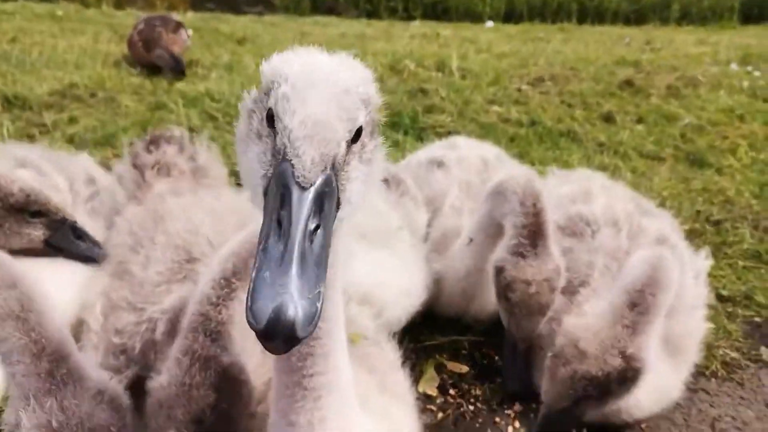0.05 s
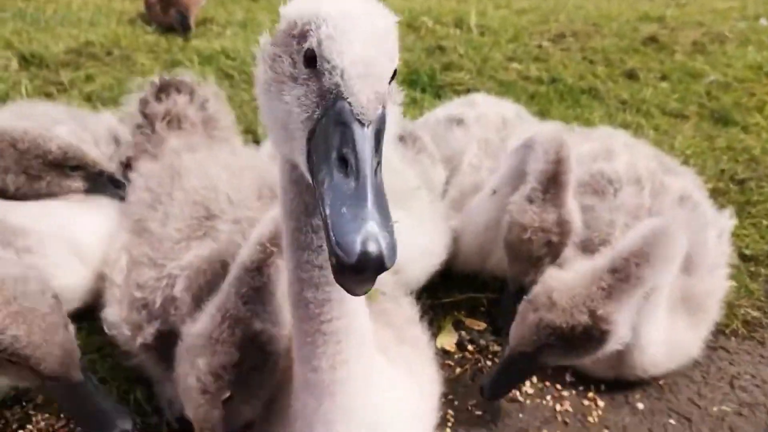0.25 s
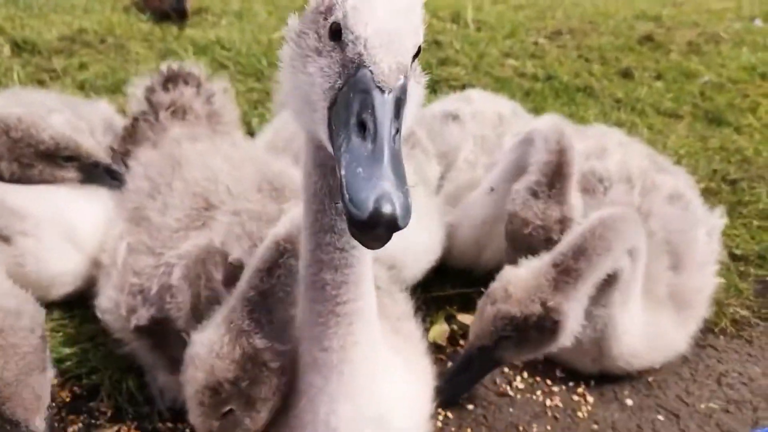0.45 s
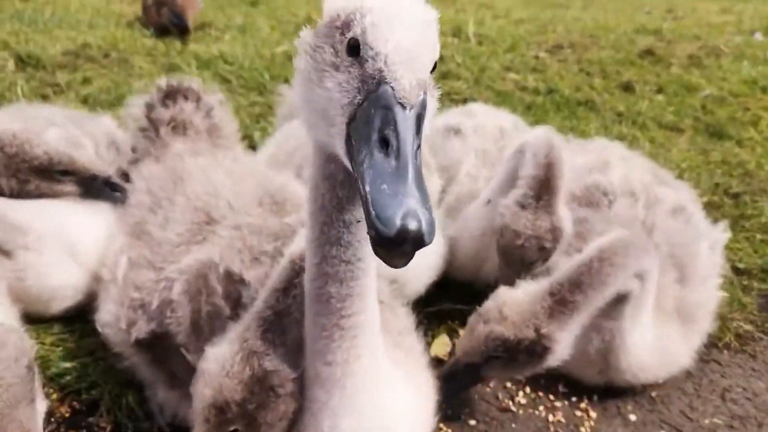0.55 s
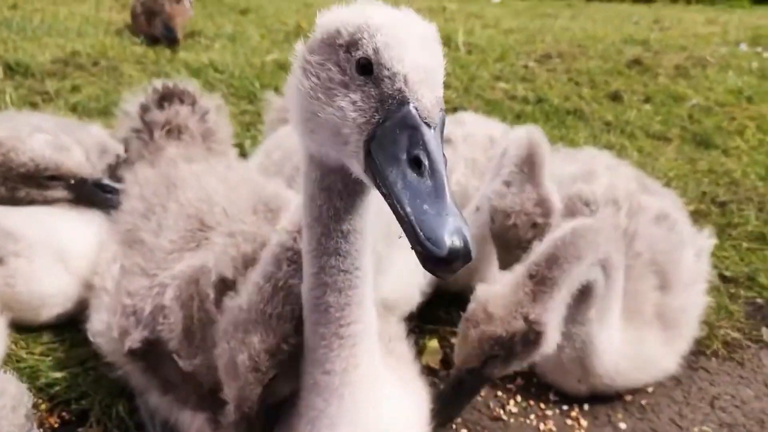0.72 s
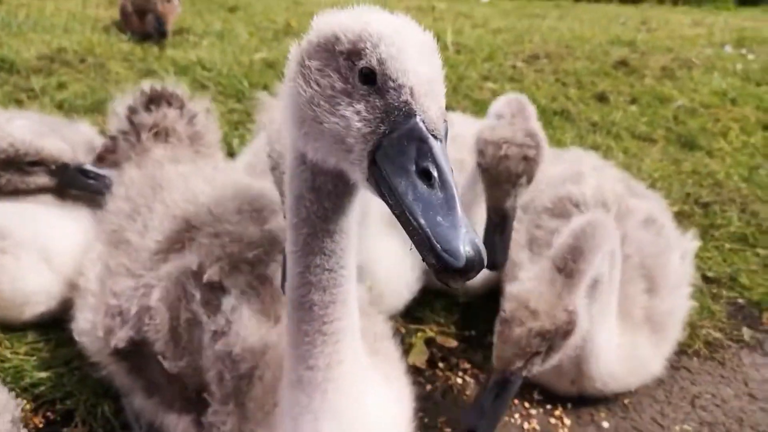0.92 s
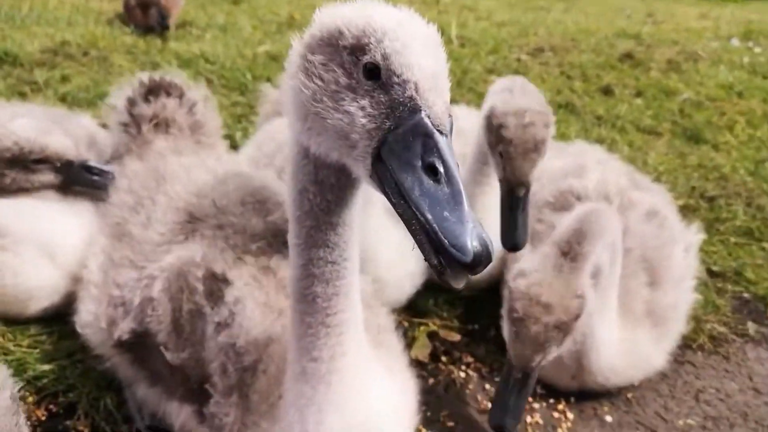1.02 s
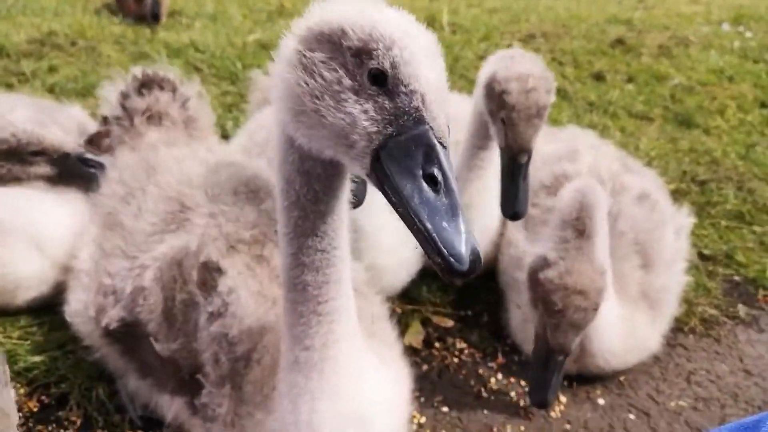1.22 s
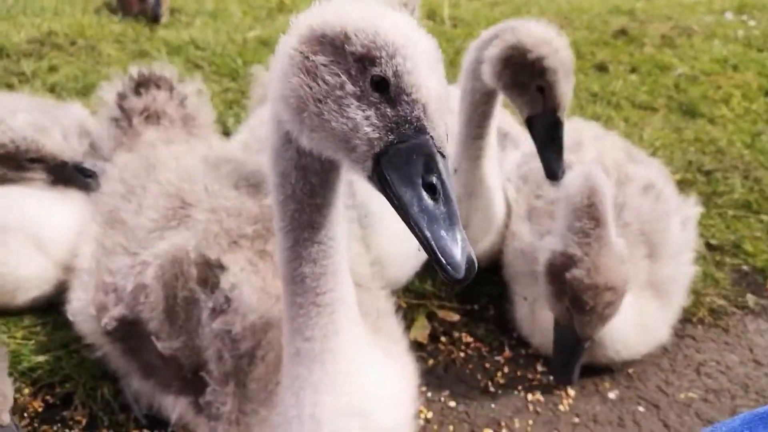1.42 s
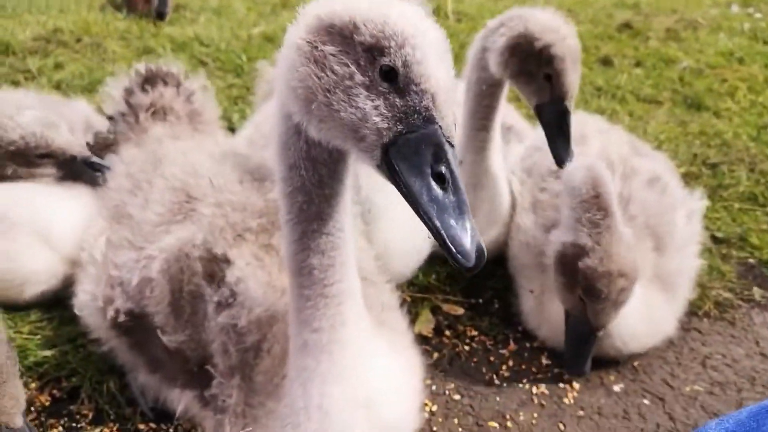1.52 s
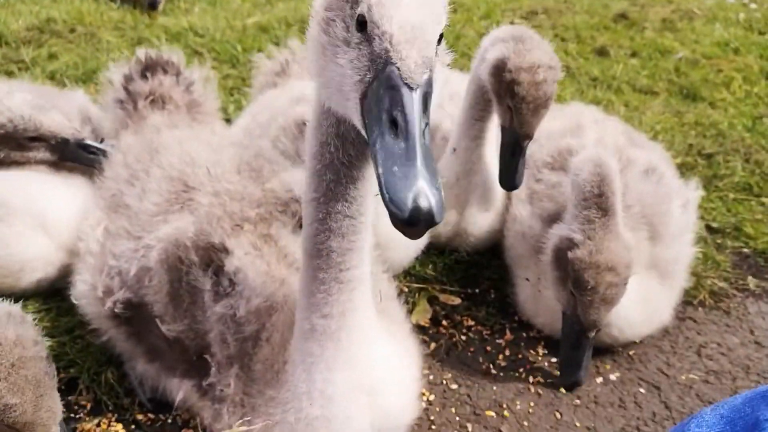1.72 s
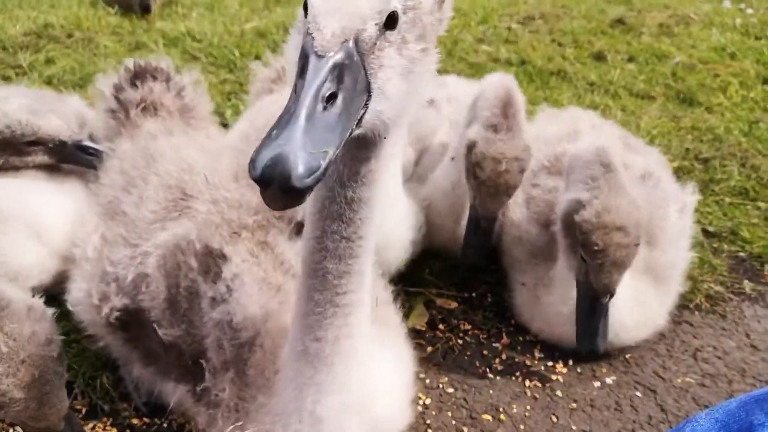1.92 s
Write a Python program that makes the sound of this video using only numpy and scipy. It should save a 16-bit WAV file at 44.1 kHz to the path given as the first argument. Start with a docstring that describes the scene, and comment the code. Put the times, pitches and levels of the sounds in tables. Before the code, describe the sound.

Young swans peep outdoors: the nearest gives three high, arched whistles, the second quavering, while others answer with soft chirps and trills. Bills tick on the ground and grass rustles faintly as wind rumbles on the microphone.

```python
"""Cygnets feeding on scattered grain at the edge of a lawn, on a stereo microphone pair.
The nearest bird gives three arched, whistling peeps, the second with a fast quaver; the others
answer with soft chirps and trills. Bills tick on the ground and feet shuffle in the grass.
Wind rumbles on the microphone over the faint hush of the distant surroundings."""
import sys
import numpy as np
from scipy import signal
from scipy.io import wavfile
from scipy.ndimage import uniform_filter1d

SR = 44100
rng = np.random.default_rng(int(sys.argv[2]) if len(sys.argv) > 2 else 0)


def master_out(mix):
    """Clip the mix to full scale and print it as 16-bit PCM to the path in sys.argv[1]."""
    frames = np.transpose(np.atleast_2d(mix))
    ceiling = np.clip(frames, -1, 1)
    pcm = np.round(ceiling * 32767).astype(np.int16)
    wavfile.write(sys.argv[1], SR, pcm)


N = 85995
TIME = np.arange(N) / SR

# how alike outdoor noise is at the two microphones: f/Hz, left-right correlation
OUTDOOR_LIKENESS = [(60, 1), (250, 0.77), (600, 0.22), (1200, 0.34), (2500, 0.2), (5000, 0.081),
                    (12000, 0.088)]


def from_db(db):
    """Decibels to gain."""
    return 10 ** (np.asarray(db) / 20)


def unit_rms(x):
    """Scale to rms 1."""
    return x / np.sqrt(np.mean(x ** 2) + 1e-20)


def in_time(rows):
    """Each column of a timed curve, at every sample."""
    times, *columns = np.transpose(rows)
    return [np.interp(TIME, times, column) for column in columns]


def at_hz(points, hz):
    """Read a curve on a log-frequency axis."""
    freqs, values = np.transpose(points)
    return np.interp(np.log(hz), np.log(freqs), values)


def drift(rate_hz):
    """Smooth random motion of rms 1, mostly slower than rate_hz."""
    pole = np.exp(-2 * np.pi * rate_hz / SR)
    motion = signal.lfilter([1], [1, -2 * pole, pole * pole], rng.standard_normal(N + SR))
    return unit_rms(motion[SR:])


def gate(start, end, edge_s):
    """1 between start and end, with rounded edges."""
    ramp = np.clip(np.minimum(TIME - start, end - TIME) / edge_s, 0, 1)
    return np.sin(np.pi / 2 * ramp) ** 2


def panned(pan_db):
    """Left and right gains at constant power."""
    return unit_rms(from_db([[pan_db / 2], [-pan_db / 2]]))


def partial(phase, pan_db, lead_rad):
    """A stereo sine of rms 1 whose phase leads at the left microphone."""
    return np.sqrt(2) * panned(pan_db) * np.sin(phase + np.array([[lead_rad], [0]]))


def banded_noise(spectrum, likeness, flicker_db):
    """Half-octave bands of stereo noise, each with its own level, flicker and likeness; rms 1."""
    edges_hz = 18 * 2 ** np.arange(0, 10.1, .5)
    white = rng.standard_normal((2, 2, N))
    out = 0
    for k, (low, high) in enumerate(zip(edges_hz, edges_hz[1:])):
        band = signal.butter(2, [low, high], "band", fs=SR, output="sos")
        mid, side = signal.sosfilt(band, white[k % 2])
        hz = np.sqrt(low * high)
        alike = np.clip(at_hz(likeness, hz), -1, 1)
        gain = from_db(at_hz(spectrum, hz) + flicker_db * drift(12.9))
        out += gain * (np.sqrt(1 + alike) * mid + np.sqrt(1 - alike) * side * [[1], [-1]])
    return unit_rms(out)


def wind():
    """Gusts buffet the microphone with a fluttering rumble."""
    # strength of the gusts: t/s, level/dB
    gusts = [(0.2, -27.5), (0.336, -31.5), (0.38, -33), (0.414, -25.5), (0.594, -41), (0.628, -31.5),
             (0.72, -27), (0.852, -44), (0.896, -30.5), (1.11, -28.5), (1.126, -43), (1.228, -34),
             (1.316, -54.5), (1.452, -48.5), (1.768, -63.5), (1.95, -48)]
    # spectrum of the rumble: f/Hz, relative density/dB
    rumble = [(20, 1.5), (45, 0.5), (90, -5.5), (125, -17), (200, -25), (320, -39), (500, -66), (900, -82)]
    # how alike the two microphones are shaken: f/Hz, left-right correlation
    likeness = [(30, 1), (90, 0.83), (200, 0.35)]
    return from_db(in_time(gusts)[0]) * banded_noise(rumble, likeness, flicker_db=4.5)


def hush():
    """The distant surroundings blend into a faint, nearly steady noise."""
    # slow rise and fall: t/s, level/dB
    swell = [(.2, -46), (.6, -43.5), (1.0, -44), (1.4, -44.5), (1.6, -46.5), (1.78, -48.5), (1.95, -44)]
    # spectrum of the surroundings: f/Hz, relative density/dB
    spectrum = [(18, -34), (30, -1), (66, -3), (92, -21), (117, -8.5), (156, -17), (187, -7.5),
                (561, -41.5), (1200, -17), (1510, -35), (1870, -22), (2910, -29.5), (4090, -32.5),
                (11300, -49.5), (15500, -50.5)]
    return from_db(in_time(swell)[0]) * banded_noise(spectrum, OUTDOOR_LIKENESS, flicker_db=2.64)


def pecks():
    """Each peck is a tiny crunch ringing in the bill; faint nibbling goes on between them."""
    # bills striking grain: t/s, force level/dB, left-right/dB
    strikes = [(.226, -35.5, 14), (.342, -32, -3), (0.373, -27.5, -1), (0.603, -18.5, -10),
               (0.6577, -30.5, -2), (.7055, -32.5, -17), (0.788, -27, -3), (1.016, -38, -5),
               (1.351, -31.5, -10), (1.402, -33, -7), (1.418, -32, -2), (1.502, -37, 0), (1.85, -34, -2)]
    # resonances of the bill: f/Hz, width/Hz, gain/dB
    bill_modes = [(2290, 460, 3.5), (5200, 650, -1), (7200, 1300, -6), (10200, 1250, -8.5),
                  (14000, 1500, -25.5)]
    decay_s, tail_s, tail_db = 0.0013, 0.0098, -22.5
    nibbles_per_s, nibble_db = 28, -44
    nibble_onsets = rng.random(N) < nibbles_per_s / SR
    nibbles = nibble_onsets * from_db(nibble_db + 5.5 * rng.standard_normal(N))
    force = signal.lfilter([1], [1, -np.exp(-1 / (decay_s * SR))], nibbles + 1e-18) * np.ones((2, 1))
    for start, db, pan_db in strikes:
        age = np.maximum(TIME - start, 0)
        fade = np.exp(-age / decay_s) + from_db(tail_db) * np.exp(-age / tail_s)
        force += from_db(db) * panned(pan_db) * (TIME >= start) * fade
    crunch = force * rng.standard_normal((2, N))
    out = 0
    for k, (hz, width, db) in enumerate(bill_modes):
        radius = np.exp(-np.pi * width / SR)
        gain = (1 - radius ** 2) / 2
        feedback = [1, -2 * radius * np.cos(2 * np.pi * hz / SR), radius ** 2]
        ring = signal.lfilter([gain, 0, -gain], feedback, crunch)
        out += (-1) ** k * from_db(db) * ring
    return out


def shuffles():
    """Feet and bodies brush the grass in brief, grainy swells."""
    # movements: peak t/s, half length/s, level/dB
    moves = [(0.347, 0.033, -43.5), (0.589, 0.016, -48), (0.708, 0.0091, -42), (0.74, .02, -43),
             (0.815, 0.0053, -38.5), (1.082, .02, -48.5), (1.387, 0.038, -48.5), (1.94, 0.029, -45.5)]
    # spectrum of the rustle: f/Hz, relative density/dB
    rustle = [(120, 15.5), (300, 13.5), (550, -12), (1000, 4.5), (2200, -3), (4000, -3), (9000, -13),
              (15000, -36)]
    swells = sum(from_db(db) * np.exp(-((TIME - peak) / half) ** 2) for peak, half, db in moves)
    roughness = unit_rms(from_db(3.5 * drift(144)))
    return swells * roughness * banded_noise(rustle, OUTDOOR_LIKENESS, flicker_db=1.5)


def chirps():
    """The other birds give short, soft bends of pitch, each pulsed by a trill."""
    # calls: t/s, length/s, start f/Hz, turn f/Hz, end f/Hz, place of the turn (0-1), level/dB,
    # relative second harmonic/dB, trill depth (0-1), trill rate/Hz, left-right/dB, left lead/rad
    calls = [(0.33, 0.073, 1963, 2170, 1830, 0.59, -32, -22.5, 0.3, 78, -4.5, 2),
             (0.567, 0.063, 2190, 2370, 2180, 0.57, -44, -17, 0.17, 73, 0, -1.47),
             (0.649, 0.045, 1820, 1930, 1800, 0.63, -41.5, -40, .5, 110, -2, 3.5),
             (0.758, 0.1, 1950, 2600, 2350, 0.78, -35.5, -18.5, .15, 56, -2, 2.5),
             (1.01, 0.079, 1920, 2430, 2040, 0.83, -43, -14, .3, 55, 5, 1.17),
             (1.079, 0.08, 1970, 2130, 1883, 0.53, -30.5, -19.5, 0.72, 113, -2, 0.93),
             (1.253, .088, 1972, 2280, 2150, 0.8, -44, -14.5, .3, 59, 6, 1.36),
             (1.298, 0.054, 2060, 1990, 2125, 0.48, -28.5, -19.5, 0.83, 111, -4.5, 1.25),
             (1.338, .057, 2026, 2200, 1902, 0.39, -28.5, -23, 0.71, 54.6, -8.5, 3.6)]
    edge_s, jitter, third_vs_second_db = 0.013, 0.0084, -7
    out = np.zeros((2, N))
    for start, length, start_hz, turn_hz, end_hz, turn, db, second_db, depth, rate, pan, lead in calls:
        along = np.clip((TIME - start) / length, 0, 1)
        bend_in = (start_hz - turn_hz) * (1 - along / turn) ** 2
        bend_out = (end_hz - turn_hz) * ((along - turn) / (1 - turn)) ** 2
        hz = turn_hz + np.where(along < turn, bend_in, bend_out)
        phase = 2 * np.pi * np.cumsum(hz * (1 + jitter * drift(160))) / SR
        trill = 1 - depth * np.sin(np.pi * rate * (TIME - start - edge_s)) ** 2
        level = from_db(db) * gate(start, start + length, edge_s) * trill
        for k, harmonic_db in enumerate([0, second_db, second_db + third_vs_second_db], 1):
            out += level * from_db(harmonic_db) * partial(k * phase, pan, k * lead)
    return out


def peep(curve, heading):
    """An arched whistle of five harmonics, quavering if it falls between 0.803 and 0.876 s."""
    edge_s, jitter, shimmer_db, rasp_db, fifth_vs_fourth_db = .004, 0.0015, 1.8, -28, -16
    quaver_hz, beat_at_s, swing_hz, dip_db, flare_db = 52.5, 0.89, 54, 12, 4.5
    arch_hz, fundamental_db, *overtones_db = in_time(curve)
    overtones_db.append(overtones_db[-1] + fifth_vs_fourth_db)
    pan_db, overtone_pan_db, *leads = heading
    # on each beat of the quaver the pitch lifts, the fundamental dips and the overtones flare
    quaver = gate(.803, .876, edge_s)
    beat = np.cos(2 * np.pi * quaver_hz * (TIME - beat_at_s))
    dip = ((1 + beat) / 2) ** 2 - .25
    hz = uniform_filter1d(arch_hz, size=300) * (1 + jitter * drift(150)) + swing_hz * quaver * beat
    phase = 2 * np.pi * np.cumsum(hz) / SR
    out = from_db(fundamental_db - dip_db * quaver * dip) * partial(phase, pan_db, leads[0])
    for k, db in enumerate(overtones_db, 2):
        level = from_db(db + flare_db * quaver * beat + shimmer_db * drift(130))
        rasp = 1 + k * from_db(rasp_db) * drift(880)
        out += level * rasp * partial(k * phase, overtone_pan_db, leads[min(k - 1, 2)])
    return out * gate(curve[0][0] - edge_s, curve[-1][0] + edge_s, edge_s)


def near_cygnet():
    """The nearest bird peeps three times, each call meeting the microphones differently."""
    # course of each peep: t/s, f/Hz, level/dB of harmonics 1 to 4
    first = [(0.359, 2203, -32.5, -57, -59, -67), (0.367, 2277, -28.5, -56, -51, -71),
             (0.376, 2487, -16.5, -52, -51, -59), (0.388, 2586, -17, -33, -56, -61),
             (0.403, 2696, -19, -29, -45.5, -56), (0.421, 2676, -17.5, -28, -47.5, -63.5),
             (0.457, 2629, -17.5, -33.5, -46, -54.5), (0.48, 2675, -18, -34.5, -44, -56),
             (0.505, 2682, -16, -39.5, -41, -52.5), (0.526, 2626, -19, -43, -44, -50),
             (0.542, 2555, -19, -43, -48, -51), (0.559, 2395, -25, -46.5, -60, -52),
             (0.573, 2007, -37, -54, -78, -66)]
    second = [(0.75, 2450, -55, -60, -70, -69), (0.754, 2500, -17.5, -47, -63, -67),
              (0.764, 2530, -20.5, -67, -59, -66), (0.775, 2706, -16.5, -40, -58, -71),
              (0.791, 2804, -32.5, -34.5, -45, -69), (0.815, 2793, -21.5, -34, -37, -68),
              (0.851, 2861, -29, -34.5, -40, -67), (0.878, 2816, -22.5, -42.5, -39, -71),
              (0.901, 2704, -19, -39, -51, -75), (0.915, 2598, -18, -42.5, -64, -69),
              (0.923, 2425, -34, -51, -68, -75), (0.937, 2084, -35, -59, -77, -82)]
    third = [(1.114, 2290, -37, -56, -63, -67), (1.12, 2476, -27.5, -54, -69, -64),
             (1.138, 2700, -35, -46, -58, -75), (1.154, 2746, -20, -33, -64, -77),
             (1.176, 2757, -20.5, -36, -60, -82), (1.205, 2792, -18.5, -36.5, -47, -76),
             (1.24, 2747, -16.5, -40, -63, -78), (1.267, 2675, -20, -47.5, -49.5, -78),
             (1.287, 2536, -32, -56, -68, -71), (1.305, 2130, -21.5, -49, -67, -71)]
    # each peep at the pair: fundamental left-right/dB, overtones left-right/dB,
    # left lead/rad of harmonics 1, 2, and 3 upward
    headings = [(-6, -9.5, 3.2, 1.2, -2), (-2.04, -11, 3.02, -2, 0.9), (0.5, -6.5, 2.793, -2, 1.55)]
    return sum(peep(curve, heading) for curve, heading in zip([first, second, third], headings))


def scene():
    """The feeding birds in front, wind and distant hush around them."""
    return near_cygnet() + chirps() + pecks() + shuffles() + wind() + hush()


def record(dry):
    """The sound cuts in after a short silence; the highest treble is filtered off."""
    start_s, stopband_hz = .2015, 16500
    lowpass = signal.cheby2(12, 70, stopband_hz, fs=SR, output="sos")
    return signal.sosfilt(lowpass, dry * (TIME >= start_s))


dry = scene()
out = record(dry)
master_out(out)
```